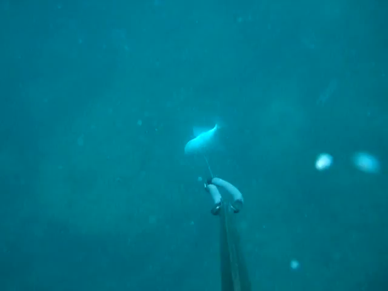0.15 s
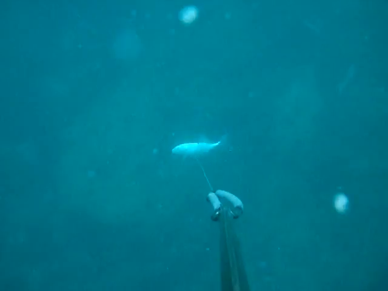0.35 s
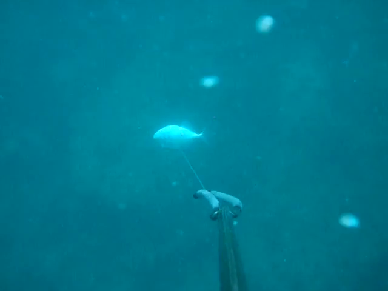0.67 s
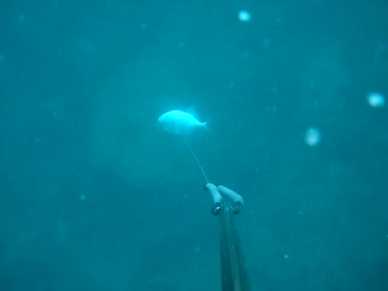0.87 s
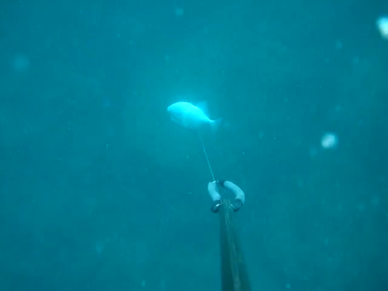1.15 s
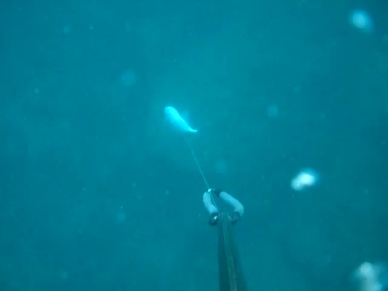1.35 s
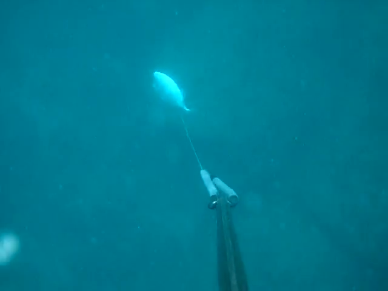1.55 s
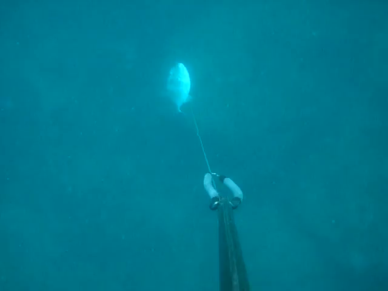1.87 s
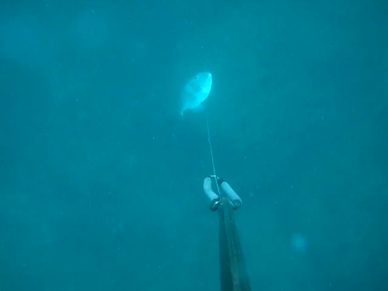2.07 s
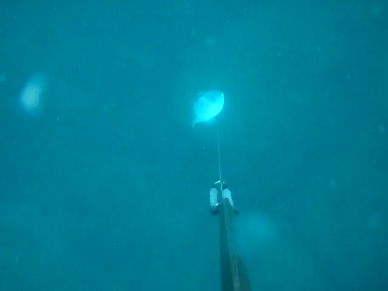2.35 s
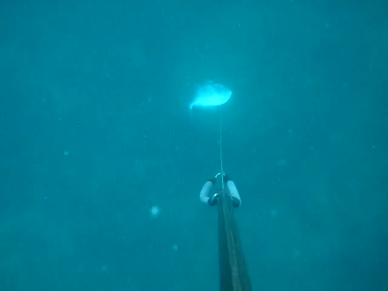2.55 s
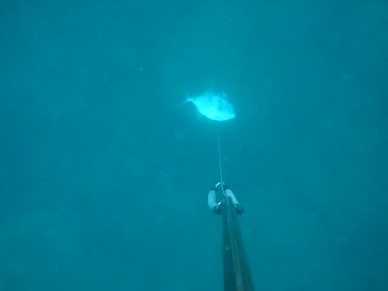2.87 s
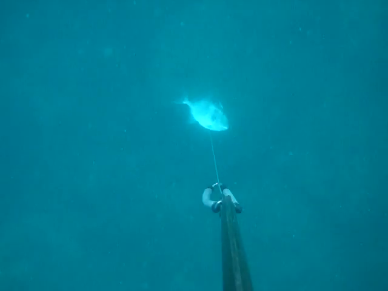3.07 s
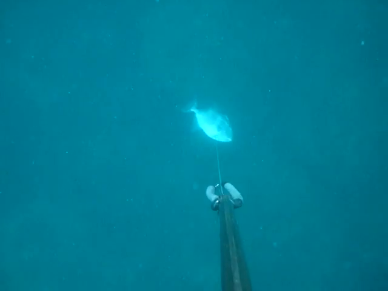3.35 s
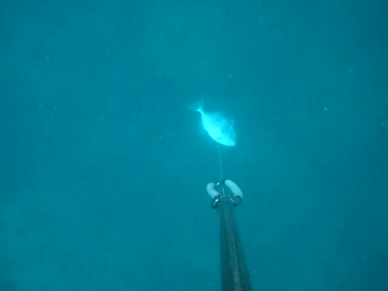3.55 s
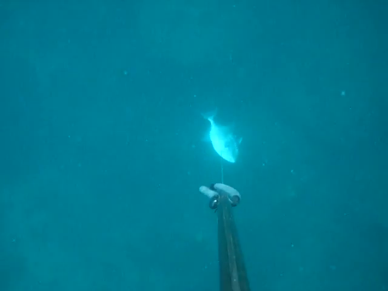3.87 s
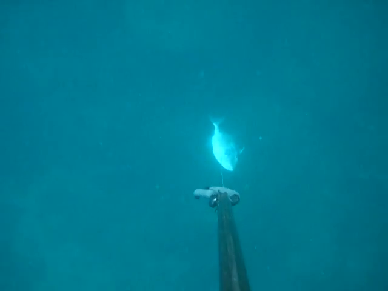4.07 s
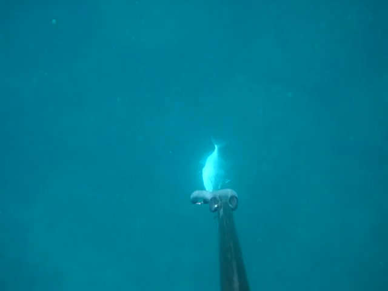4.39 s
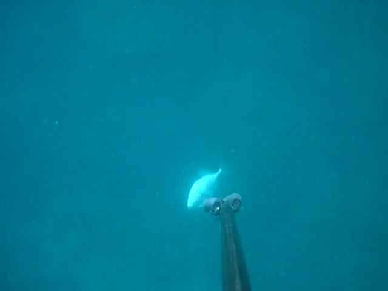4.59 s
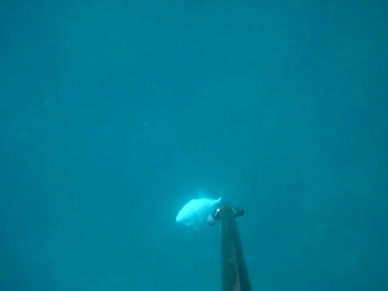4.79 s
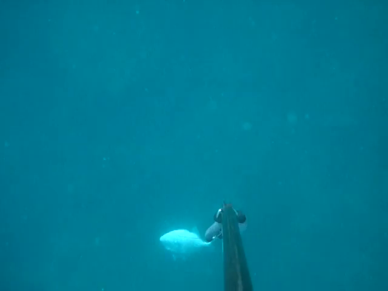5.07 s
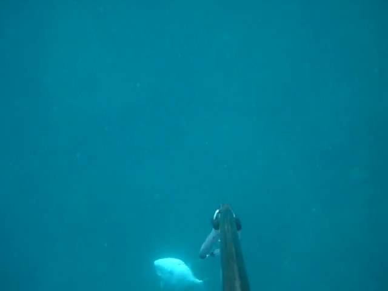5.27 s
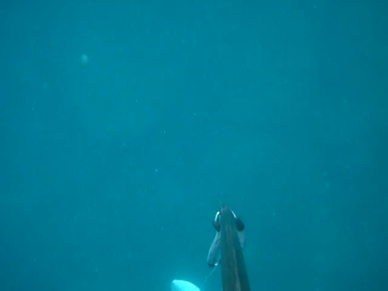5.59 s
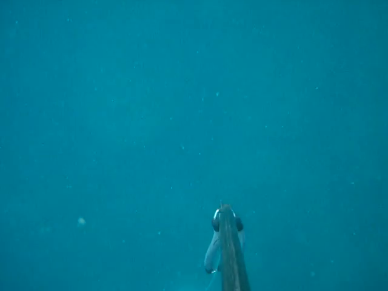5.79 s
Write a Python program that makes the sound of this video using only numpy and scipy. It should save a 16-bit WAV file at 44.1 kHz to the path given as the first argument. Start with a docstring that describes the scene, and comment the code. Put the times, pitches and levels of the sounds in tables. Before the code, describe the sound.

An underwater scene heard close and boxy through a sealed housing on a speargun while a fish is pulled in. A steady, muffled hiss of sea continues throughout, covered by fine frying crackle from distant snapping shrimp and brighter nearby clicks, each with a tiny fizz. From 0 to 1 s there is soft rubbing and light taps, one firmer at 0.4. At about 1.3-1.55 s a rapid, loud tumble of dull, hollow knocks hits the housing, with a short low rumble. Then handling eases; small clear pings appear around 1.6-2.2 s, and strong snaps at 2.5-2.6. Single thumps fall near 2.8 and 3.3 s, with snap clusters around 3.5. A short high ping sounds at 4.2, then small bubble blips and a sharp snap between 4.5 and 4.9. After a calmer stretch, a thump and dense snaps come at about 5.6, followed by a rising bubble blip and pings.

```python
"""Underwater, with the microphone in a closed housing on a speargun as a diver hauls in a speared fish.
Snapping shrimp, clicks with a fizz of noise, crackle near and far over the shaped-noise hiss of the sea.
The line and hands knock and rub on the housing, setting its modes ringing; flow past it rumbles as
low noise, and its flexing gives slow pressure pulses. Small bubbles slip out as sliding sines, and
trapped air pockets ping as decaying sines."""
import sys
import numpy as np
from scipy import signal
from scipy.fft import rfft, irfft
from scipy.io import wavfile

SR = 44100
rng = np.random.default_rng(int(sys.argv[2]) if len(sys.argv) > 2 else 0)


def master(y):
    """Save y as 16-bit WAV."""
    cut = np.clip(np.atleast_2d(y).T, -1, 1)
    pcm = np.round(cut * 32767)  # scale
    wavfile.write(sys.argv[1], SR, pcm.astype(np.int16))


N = 261513

# resonances by which the housing lets in the water's sound: (frequency [Hz], width [Hz], gain [dB])
WALL_MODES = [(1832, 102, -2.5), (2485, 376, -0.5), (3534, 152, 5), (4633, 537, 3), (6480, 207, 1),
              (7850, 860, 4)]
# knocks on the housing: (time [s], level [dB], hard ring re level [dB], thud re level [dB])
KNOCKS = [(0.145, -40.5, -3, -18), (0.263, -36, -10, -23), (0.311, -37, -23, -7), (0.32, -34, -6, -14),
          (0.328, -38.5, -17, -0.5), (0.418, -23, -9.5, -22), (0.434, -37.5, -2, -6), (0.574, -48, 15, -15),
          (0.732, -35, -6.5, -15), (0.98, -33, -25, -18), (1.163, -36.5, -7, -4), (1.215, -37, -14, -20),
          (1.245, -35, -8, -24), (1.297, -33, -10, -18), (1.321, -19.5, -18, -17), (1.327, -8, -41, -28),
          (1.339, -32, -1, -9), (1.345, -9.5, -38, -23), (1.35, -13, -12.5, -15),
          (1.359, -13.5, -31, -12.5), (1.368, -25, -9, -26), (1.451, -28, -23, -27), (1.456, -31, -16, -20),
          (1.462, -38, -20, -23), (1.482, -23, -23, -15), (1.487, -17.5, -25, -13), (1.494, -29, -17, -11),
          (1.5, -17.5, -16, -25), (1.509, -20, -12, -6.5), (1.517, -13.5, -36, -31), (1.525, -30, -23, -12),
          (1.534, -29, -5, -13), (1.553, -38, -9, -12), (1.575, -30.5, 7, -9.5), (1.681, -36, -30, -13),
          (2.441, -41, -26, -25), (2.805, -22, -18, -15.5), (3.113, -31, -34, -20),
          (3.298, -16.5, -20, -27), (4.23, -36.5, -17, -15), (4.372, -36.5, -1, -21), (4.426, -34, 8, -14),
          (4.48, -42, -4, -6), (4.521, -34.5, -6, -15), (4.831, -37.5, -14, -16), (4.943, -40, 0.5, -22),
          (4.997, -38, -12, -14), (5.324, -30.5, -13, -20), (5.564, -15.5, -16, -24),
          (5.577, -40, -25, -25), (5.904, -29, -17, -30)]
# housing modes: air space, hard ring, thud, upper ring, lingering tail, deep thud:
# (frequency [Hz], knock gain [dB], 60 dB decay of the first ring [s])
HOUSING = [(572.3, 3.5, 0.018), (1000, 5.5, 0.013), (322, 13, 0.012), (1434, -9, 0.03),
           (493.4, -13.5, 0.081), (200, 2.5, 0.022)]


def from_db(db):
    """Decibels to an amplitude factor."""
    return 10 ** (np.asarray(db) / 20)


def rms_one(x):
    """Scale to an rms of 1."""
    return x / np.sqrt(np.mean(x ** 2) + 1e-20)


def in_time(rows):
    """Draw each column of a table as straight lines over time."""
    s, *columns = np.transpose(rows)
    return [np.interp(np.arange(N) / SR, s, column) for column in columns]


def clicks(s, db):
    """One impulse per event, over a floor far below hearing."""
    out = np.full(N, 1e-18)
    np.add.at(out, np.minimum((np.asarray(s) * SR).astype(int), N - 1), from_db(db))
    return out


def smooth(x, seconds):
    """One-pole decay; a unit click jumps to 1."""
    return signal.lfilter([1], [1, -np.exp(-1 / (seconds * SR))], x)


def swell(x, rise_s, fall_s):
    """Envelope that rises and falls after each click; a unit click peaks at 1."""
    unit_click = np.eye(1, 4000)[0]
    top = smooth(smooth(unit_click, rise_s), fall_s).max()
    return smooth(smooth(x, rise_s), fall_s) / top


def ring(x, hz, t60):
    """A unit click sets a sine ringing from height 1, down 60 dB after t60 seconds."""
    r = from_db(-60 / (t60 * SR))
    w = 2 * np.pi * hz / SR
    return signal.lfilter([0, np.sin(w)], [1, -2 * r * np.cos(w), r * r], x)


def resonance(x, hz, width_hz):
    """Two-pole resonance passing its own frequency at about unit gain."""
    r = np.exp(-np.pi * width_hz / SR)
    feed = np.array([1, 0, -1]) * (1 - r * r) / 2
    return signal.lfilter(feed, [1, -2 * r * np.cos(2 * np.pi * hz / SR), r * r], x)


def band(x, low_hz, high_hz):
    """Keep the sound between two frequencies."""
    return signal.sosfilt(signal.butter(2, [low_hz, high_hz], "band", fs=SR, output="sos"), x)


def coloured_noise(spectrum):
    """Steady noise of the given spectrum, rms 1."""
    hz, level_db = np.transpose(spectrum)
    grid = np.maximum(np.fft.rfftfreq(N, 1 / SR), 1)
    gain = from_db(np.interp(np.log(grid), np.log(hz), level_db))
    return rms_one(irfft(rfft(rng.standard_normal(N)) * gain, N))


def waver():
    """Slow random drift of rms 1: white noise smoothed twice."""
    waver_s = 0.018
    return rms_one(smooth(smooth(rng.standard_normal(N), waver_s), waver_s))


def sea_hiss():
    """The steady hiss of the sea: noise with the broad slope that the housing lets in."""
    # spectrum inside the housing: (frequency [Hz], relative level per hertz [dB])
    wall_slope = [(88, -39.5), (150, 4), (570, 0.5), (1110, 2.5), (1300, -2.5), (1850, 3), (2090, -2.5),
                  (2580, -1), (3480, 4), (3940, -5), (4620, -7), (5800, -11.5), (6680, -33.5), (7680, -3),
                  (10000, -14), (13000, -49), (22000, -120)]
    return from_db(-51.5) * coloured_noise(wall_slope)


def far_snaps(per_s, colour_db):
    """Random faint snaps; each reaches only some wall resonances, with a strength of its own; rms 1."""
    born = rng.random(N) < per_s / SR
    out = 0
    for hz, width, db in WALL_MODES:
        reaches = born & (rng.random(N) < .22)
        chance = np.clip(rng.standard_normal(N), -3, 1.8)
        strength = reaches * from_db(colour_db * chance) + 1e-18
        burst = rng.standard_normal(N) * swell(strength, 0.0002, 0.0027)
        out = out + from_db(db) * band(burst, hz - 1.36 * width, hz + 1.48 * width)
    return rms_one(out)


def singing(level_db):
    """Many faint snaps, as random taps, keep the lowest wall resonance sounding."""
    hz, width, _ = WALL_MODES[0]
    taps_per_s = 500
    taps = (rng.random(N) < taps_per_s / SR) * rng.standard_normal(N) + 1e-18
    sung = resonance(resonance(taps, hz, 3.2 * width), hz, 3.2 * width)
    return from_db(level_db - 1.0) * rms_one(sung)


def far_colony():
    """The distant shrimp: crackle and singing that come and go in strength."""
    # the far colony: (time [s], crackle level before a 10 dB lift [dB], singing level before a 1 dB cut [dB])
    colony = [(0, -53, -52), (1.07, -56, -57.5), (1.37, -54, -47), (2.0, -58, -53), (2.21, -53, -51),
              (2.5, -56.5, -51.5), (3.17, -54, -56), (3.5, -55.5, -53), (3.88, -55.5, -56),
              (4.57, -52.5, -54.5), (5.3, -55, -63), (5.6, -52, -50), (5.93, -55, -65)]
    crackle_db, singing_db = in_time(colony)
    crackle = from_db(crackle_db + 10.0) * far_snaps(per_s=900, colour_db=0.5)
    return crackle + singing(singing_db)


def flow_rumble(level_db, lumps):
    """Water flowing past the housing: low noise that comes in uneven lumps."""
    # rumble spectrum: (frequency [Hz], relative level per hertz [dB])
    rumble_spectrum = [(12, -30.5), (20, 3), (86, 3), (135, -4.5), (200, -11), (260, -38.5), (440, -120)]
    waver_db = 1.5
    return from_db(level_db + waver_db * lumps) * coloured_noise(rumble_spectrum)


def flexes():
    """The housing flexes and presses or eases the air inside: a quick pressure step that leaks away."""
    # flexes: (time [s], peak level [dB], direction of the step [+1 or -1])
    flex_table = [(.27, -40.5, -1), (2.409, -40.5, 1), (2.505, -44, -1), (3.142, -44, -1),
                  (5.417, -39.5, 1)]
    s, db, direction = np.transpose(flex_table)
    up, down = direction > 0, direction < 0
    steps = clicks(s[up], db[up]) - clicks(s[down], db[down])
    return swell(steps, .005, 0.03)


def bubbles():
    """Slightly rough sines whose pitch slides while the bubble is squeezed free."""
    # bubbles: (start [s], length [s], first pitch [Hz], last pitch [Hz], level before flutter [dB])
    bubble_table = [(4.539, 0.035, 1120, 1110, -42.5), (4.58, .015, 950, 930, -49),
                    (4.7, 0.042, 1104, 1050, -48), (4.699, 0.04, 727, 640, -51),
                    (4.737, 0.027, 915, 905, -49), (4.783, 0.017, 920, 930, -52),
                    (4.933, 0.021, 1082, 970, -48), (5.655, 0.056, 430, 586, -40),
                    (5.742, 0.032, 535, 590, -49), (5.837, 0.064, 125, 123, -47.5)]
    out = np.zeros(N)
    for s, length, first_hz, last_hz, db in bubble_table:
        u = np.arange(int(length * SR)) / (length * SR)  # 0 to 1 through the bubble
        pitch_hz = first_hz + (last_hz - first_hz) * u
        tone = np.sin(2 * np.pi * np.cumsum(pitch_hz) / SR)
        fade = np.minimum(1, 6 * np.minimum(u, 1 - u))
        start = int(s * SR)
        out[start:start + len(u)] += from_db(db) * fade * tone
    flutter = rms_one(smooth(smooth(rng.standard_normal(N), .002), .002))
    return out * from_db(2.5 * flutter)


def pings():
    """Clear pings of small trapped air pockets: sines with a brief onset and an exponential decay."""
    # pings: (time [s], level before a 7 dB lift [dB], pitch [Hz], 60 dB decay [s])
    ping_table = [(0.658, -39, 1750, 0.062), (1.549, -38, 2300, 0.026), (1.6586, -37, 2370, 0.023),
                  (1.8257, -40, 1870, 0.065), (1.8505, -39, 1850, 0.035), (1.957, -33.5, 1910, 0.033),
                  (2.1909, -35, 1870, 0.027), (2.406, -41, 1440, 0.028), (4.0142, -43, 1570, 0.03),
                  (4.1974, -24.5, 2500, 0.018), (4.5356, -36, 1740, 0.02), (4.7268, -35.5, 1916, 0.042),
                  (5.6888, -32.5, 1940, 0.028), (5.7037, -38, 2050, 0.02)]
    out = np.zeros(N)
    for s, db, hz, t60 in ping_table:
        start = int(s * SR)
        t = np.arange(min(4000, N - start)) / SR
        decay = from_db(db + 7.0 - 60 * t / t60)
        onset = 1 - np.exp(-t / 0.00053)
        out[start:][:len(t)] += decay * onset * np.sin(2 * np.pi * hz * t)
    return out


def through_wall(x, between_db):
    """The housing wall favours its resonances and passes a little of all else."""
    modes = 0
    for k, (hz, width, db) in enumerate(WALL_MODES):
        modes = modes + (-1) ** k * from_db(db) * resonance(x, hz, width)  # signs alternate
    return modes + from_db(between_db) * x


def near_snaps():
    """A sharp click followed by a few ms of noise from the collapsing bubble."""
    # loudest near snaps, ahead of the wall:
    # (time [s], level [dB], strongest frequency [Hz], fall to either side [dB per octave])
    snap_table = [(0.0553, -22, 4450, 15), (0.073, -28, 2950, 7), (0.081, -16, 4050, 17),
                  (0.3262, -20.5, 6300, 11), (0.334, -28.5, 3280, 3), (0.4273, -23.5, 4950, 8),
                  (0.4405, -15.5, 5220, 17), (0.4657, -27.5, 3580, 8), (0.5968, -20, 4200, 5),
                  (0.6367, -21, 4190, 9), (0.6588, -16, 2820, 18), (0.7221, -14.5, 6300, 15),
                  (1.1135, -24.5, 5700, 4), (1.2366, -23, 2940, 10), (1.5, -24, 4230, 8),
                  (1.5503, -27, 3050, 5), (1.6405, -26, 2880, 2.5), (1.7678, -27, 3440, 5),
                  (1.9585, -26, 2220, 16), (2.1918, -25, 2530, 21), (2.2973, -17.5, 4280, 8),
                  (2.3444, -20, 2920, 13), (2.4304, -18, 6100, 9), (2.5308, -12, 4070, 18.5),
                  (2.5551, -15, 3400, 18), (2.6194, -11.5, 3800, 7.5), (2.7125, -23, 3030, 16),
                  (2.8158, -23, 3060, 18), (2.8786, -28.5, 3890, -1.5), (3.1717, -15, 4570, 11.5),
                  (3.2977, -22, 2820, 7), (3.4209, -15.5, 3650, 14.5), (3.4546, -23, 2770, 7),
                  (3.4668, -23, 3000, 3), (3.4753, -15, 4060, 14), (3.4973, -22, 3800, 7),
                  (3.5068, -18, 3630, 10), (3.5992, -22.5, 3930, 9.5), (3.624, -23, 3970, 14),
                  (3.8012, -32, 3240, -2), (3.8384, -28, 3640, 2), (4.0161, -18.5, 3430, 23),
                  (4.0928, -26, 4170, 9), (4.1539, -18, 3090, 26), (4.1677, -23.5, 4140, 10),
                  (4.1976, -23, 2800, 10), (4.2263, -24, 5970, 16), (4.3161, -26, 3550, 11),
                  (4.3847, -23.5, 4870, 5), (4.4266, -28.5, 2630, 6), (4.465, -18.5, 3490, 11),
                  (4.5192, -16, 3800, 11), (4.5392, -24, 2200, 14), (4.5476, -18.5, 2850, 7),
                  (4.5553, -31, 3570, 8), (4.605, -28.5, 4590, 5), (4.6556, -20.5, 2120, 20),
                  (4.6937, -9, 3670, 23), (4.729, -29, 2180, 15), (5.0495, -25, 3400, 10.5),
                  (5.1167, -26.5, 3850, 7), (5.1697, -25.5, 3200, 4.5), (5.3283, -19, 2400, 12),
                  (5.366, -26.5, 4490, 3), (5.4336, -28, 3900, 4.5), (5.4538, -27.5, 4580, 3),
                  (5.5601, -25, 3180, 7), (5.5676, -28, 2790, 4), (5.5913, -13, 3120, 13.5),
                  (5.6061, -21.5, 3160, 2.5), (5.6251, -20, 3380, 16), (5.6783, -25.5, 5480, 6),
                  (5.6893, -25, 2260, 17), (5.7045, -23.5, 2310, 12), (5.7351, -19, 3800, 22),
                  (5.7663, -29, 2540, 3), (5.7736, -25.5, 4330, 4), (5.7846, -25, 3770, 7),
                  (5.8632, -22.5, 3860, 11), (5.9217, -20, 2600, 11)]
    # bands of a snap: (low edge [Hz], high edge [Hz], gain [dB], noise decay constant [s])
    snap_parts = [(1495, 2540, 8.5, 0.0034), (2595, 3316, 7.5, 0.0024), (4070, 5950, 4, 0.0021),
                  (5760, 9850, 3, 0.0015)]
    # lesser near snaps come at random times
    stray_per_s, stray_db, stray_spread_db, stray_fall_db = 10, -29, -0.5, 7
    draw = rng.random((int(stray_per_s * N / SR), 3))
    stray = np.transpose([draw[:, 0] * N / SR,
                          stray_db - stray_spread_db * np.log(draw[:, 1] + .05),
                          2000 * 3.5 ** draw[:, 2],  # strongest between 2 and 7 kHz
                          np.full(len(draw), stray_fall_db)])
    s, db, strongest_hz, fall_db = np.transpose(np.vstack([snap_table, stray]))
    out = 0
    for low_hz, high_hz, gain_db, decay_s in snap_parts:
        octaves_off = np.abs(np.log2(np.sqrt(low_hz * high_hz) / strongest_hz))
        struck = clicks(s, db - fall_db * octaves_off + gain_db)
        fizz = rng.choice([-1, 1], N) * swell(struck, 0.0001, decay_s)
        out = out + band(fizz + from_db(7) * struck, low_hz, high_hz)
    return out


def rubbing(level_db, lumps):
    """Dense uneven slips excite the housing modes; every knock also leaves a short gritty rattle."""
    # how strongly rubbing excites each housing mode, in the order of HOUSING: (gain [dB])
    rub_shares_db = [0.5, -8, 4, -13.5, 3.5, -8]
    slips_per_s, waver_db = 1500, 3
    slips = (rng.random(N) < slips_per_s / SR) * rng.standard_normal(N)
    slips = slips * from_db(2.1 * np.minimum(rng.exponential(1, N), 3))  # some slips stronger
    body = sum(from_db(db) * resonance(slips, hz, 0.23 * hz)
               for (hz, *_), db in zip(HOUSING, rub_shares_db))
    s, db, *_ = np.transpose(KNOCKS)
    rattle = swell(clicks(s, db - 31.5), 0.0026, 0.0083)
    rub = from_db(level_db + waver_db * lumps - 2.0)
    return (rub + rattle) * rms_one(band(body, 110, 1760))


def knocks():
    """A soft contact: the push swells for a moment, so every mode builds up before it dies."""
    s, db, hard_db, thud_db = np.transpose(KNOCKS)
    shares_db = (0, hard_db, thud_db, hard_db, 0, thud_db)  # one per housing mode
    out = np.zeros(N)
    for (hz, mode_db, t60), share_db in zip(HOUSING, shares_db):
        struck = ring(clicks(s, db + share_db + mode_db), hz, t60)
        for _ in range(3):  # each pass softens the onset
            struck = resonance(struck, hz, 0.79 * hz)
        out += from_db(2.5) * struck
    return out


def scene():
    """The sea, the shrimp and the handling of the gun, summed at the microphone."""
    # handling: (time [s], rubbing level before a 2 dB cut and waver [dB], flow rumble level before waver [dB])
    handling = [(0, -44.5, -48.5), (0.11, -59, -56), (0.2, -46.5, -50), (0.33, -44, -50.5),
                (0.43, -52, -54), (0.5, -57.5, -59.5), (0.88, -50.5, -55), (1.0, -40.5, -49),
                (1.09, -59, -60), (1.15, -47, -58), (1.17, -43.5, -46), (1.25, -42.5, -60),
                (1.3, -48.5, -60), (1.35, -37, -33.5), (1.42, -48.5, -54), (1.53, -49, -36.5),
                (1.62, -51.5, -58), (1.85, -53, -60), (2.29, -62.5, -65), (2.43, -53, -54),
                (2.82, -55.5, -55), (2.92, -58, -58), (3.48, -55, -61), (4.06, -60, -66.5),
                (4.25, -55, -62), (4.31, -48, -52), (4.66, -54.5, -68), (4.79, -53.5, -53.5),
                (5.04, -58, -59), (5.3, -53, -62), (5.6, -58, -55), (5.93, -56.5, -59)]
    rub_db, rumble_db = in_time(handling)
    lumps = waver()  # rubbing and rumble swell together
    water = sea_hiss() + far_colony() + through_wall(near_snaps(), between_db=-5.5)
    flow = flow_rumble(rumble_db, lumps) + flexes()
    air = bubbles() + pings()
    contact = rubbing(rub_db, lumps) + knocks()
    return (water + flow + air + contact)[None]


def record(dry):
    """The microphone has a dip in the high treble and is weaker above it, then the top is cut."""
    below = signal.sosfilt(signal.butter(10, 8350, fs=SR, output="sos"), dry)
    above = signal.sosfilt(signal.butter(8, 8900, "high", fs=SR, output="sos"), dry)
    cutoff_hz = 10000
    top_cut = signal.ellip(9, 1, 50, cutoff_hz, fs=SR, output="sos")
    return signal.sosfilt(top_cut, below + from_db(-2) * above)


dry = scene()
out = record(dry)
master(out)
```